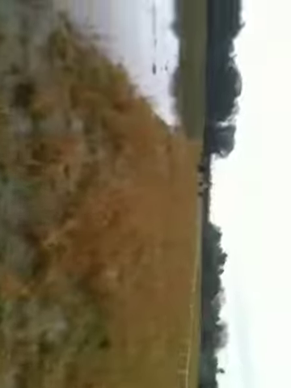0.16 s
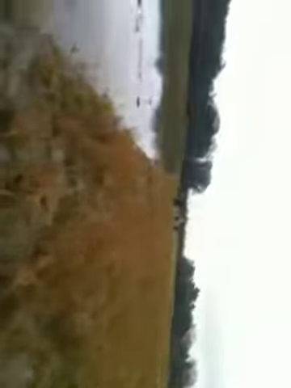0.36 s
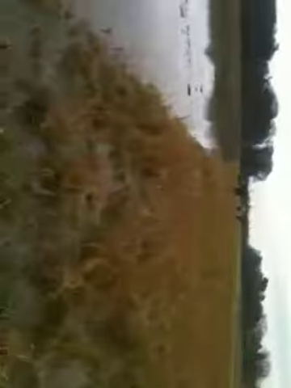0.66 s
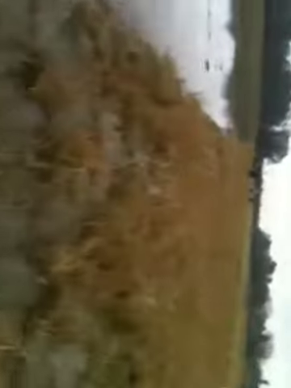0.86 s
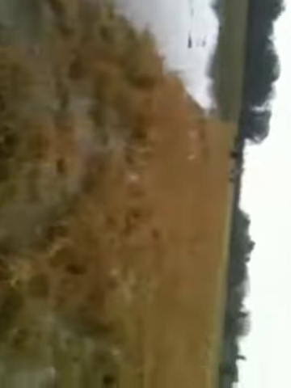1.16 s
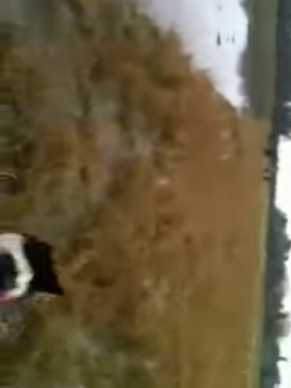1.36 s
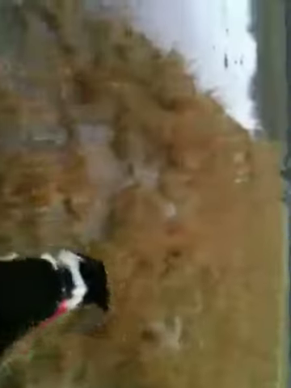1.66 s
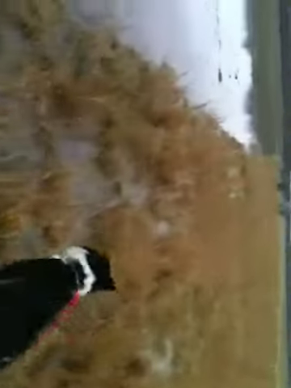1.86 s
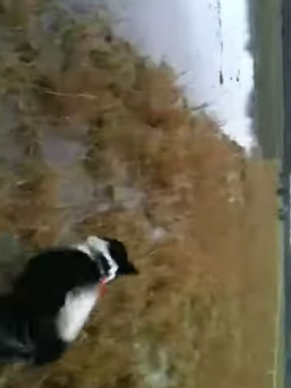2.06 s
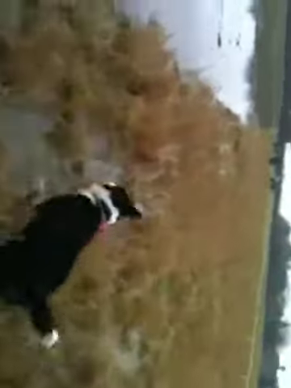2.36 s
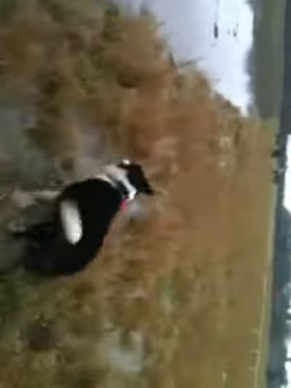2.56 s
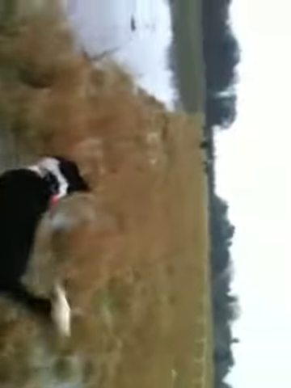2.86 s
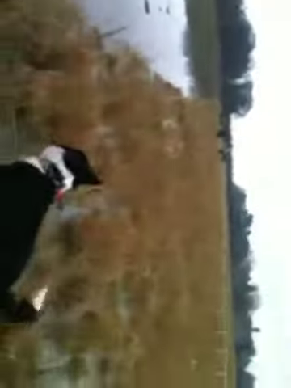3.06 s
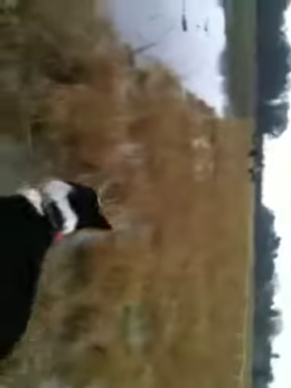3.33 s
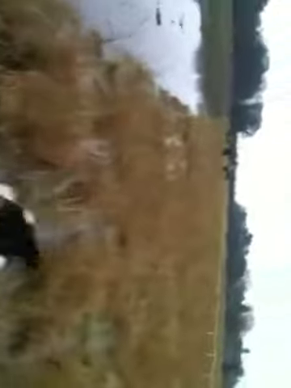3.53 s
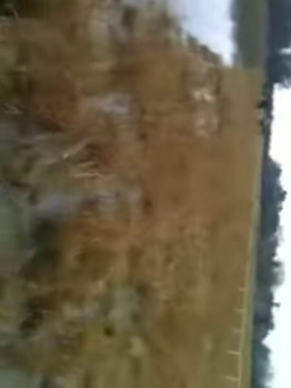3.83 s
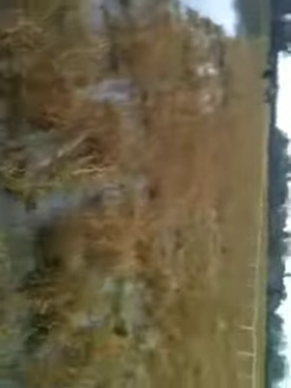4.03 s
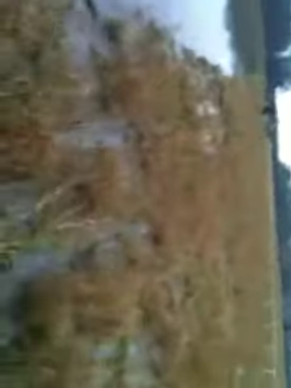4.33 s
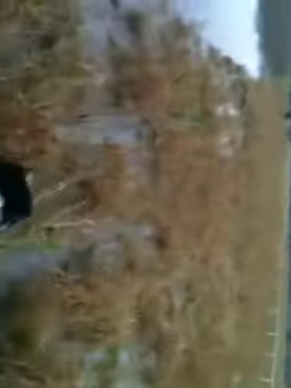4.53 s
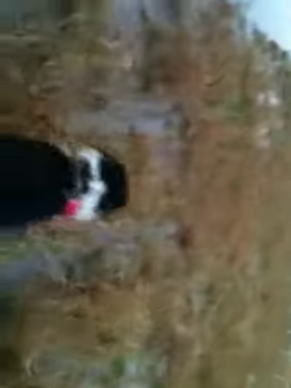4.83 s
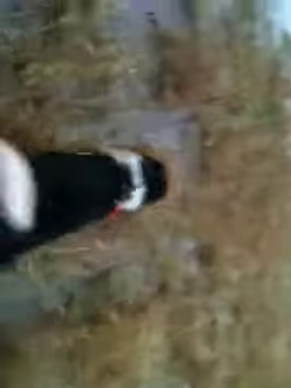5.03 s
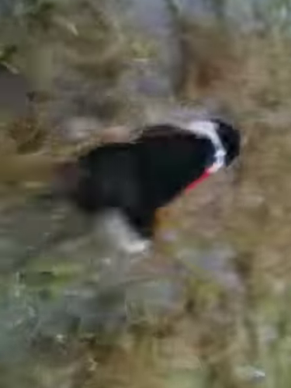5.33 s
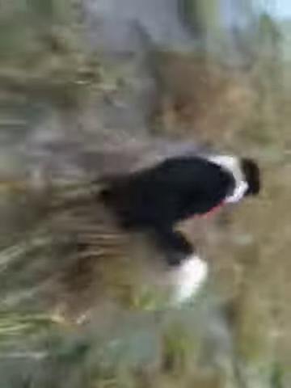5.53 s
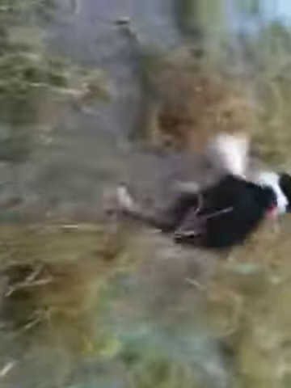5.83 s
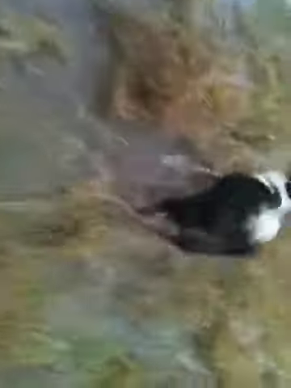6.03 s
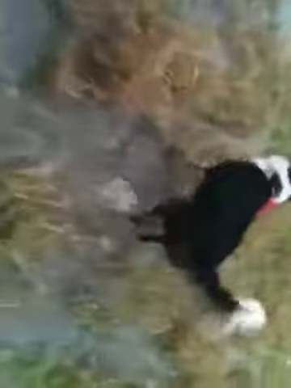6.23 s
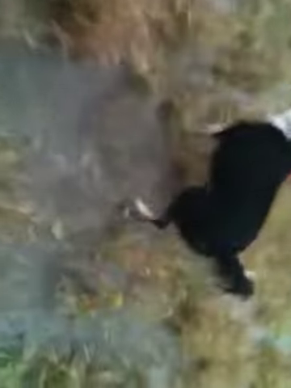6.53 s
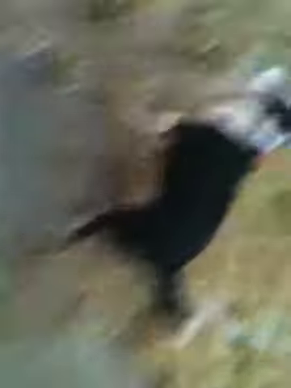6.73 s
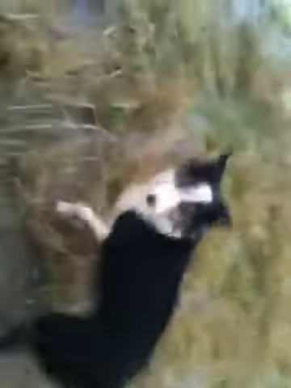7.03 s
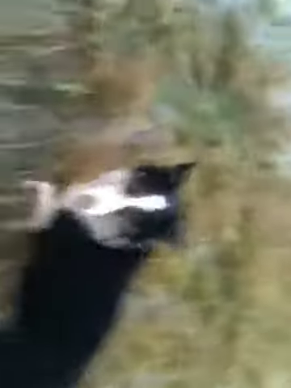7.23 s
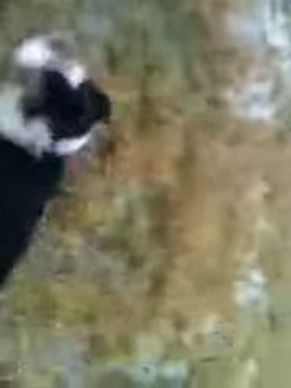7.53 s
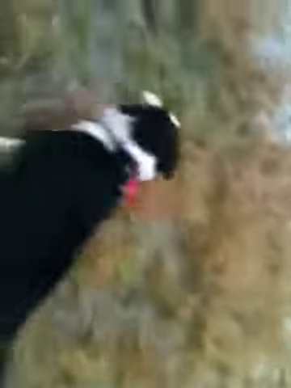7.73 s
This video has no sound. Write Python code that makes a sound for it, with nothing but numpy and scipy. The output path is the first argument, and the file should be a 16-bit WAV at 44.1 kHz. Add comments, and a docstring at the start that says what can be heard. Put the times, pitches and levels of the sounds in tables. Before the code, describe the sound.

A dog wades through shallow water in a flooded grassy field, paws slapping, splashing and gurgling close by over a faint distant engine hum.

```python
"""Stirred water trickles through a flooded grass field, close to the microphone, and a dog wades past in it.
Each step slaps the shallow water, throws spray (dense swarms of short damped tones and noise) through the grass
and traps air that gurgles, plops and chirps (damped bubbles). Paws thud softly in the sodden turf (low noise)
and stalks brush past (high hiss). Far away an engine hums (harmonics of its shaft over a rumble),
over a faint low rush with a thin, steady high hiss (coloured noise)."""
import sys
import numpy as np
from scipy import signal
from scipy.fft import rfft, irfft, next_fast_len
from scipy.io import wavfile
from scipy.ndimage import uniform_filter1d, map_coordinates

SR = 44100
rng = np.random.default_rng(int(sys.argv[2]) if len(sys.argv) > 2 else 0)


def log_audio(samples):
    """Write samples as a 16-bit WAV file to the path given in sys.argv[1]."""
    # one column per channel
    frames = np.atleast_2d(samples).T
    # limit to full scale, then quantise
    limited = np.clip(frames, -1, 1)
    pcm = np.round(limited * 32767).astype(np.int16)
    wavfile.write(sys.argv[1], SR, pcm)


N = 347508

# colour of water thrown through grass: (frequency [Hz], level [dB])
SPRAY_COLOUR = [(410, -27.5), (700, -12.5), (1680, -10), (3760, -1), (4460, -2), (5570, -0.5), (8790, -2),
                (11300, -9), (14200, -10.5), (15800, -15.5)]


def amp(db):
    """Decibels to gain."""
    return 10 ** (np.asarray(db) / 20)


def unit(x):
    """Scale to rms 1."""
    return x / np.sqrt(np.mean(x ** 2) + 1e-20)


def curves(rows):
    """One value per sample for each column after the time."""
    s, *cols = np.transpose(rows)
    return [np.interp(np.arange(N) / SR, s, c) for c in cols]


def wobble(rate):
    """A smooth random curve, rate knots a second."""
    knots = rng.standard_normal(int(N * rate / SR) + 4)
    return map_coordinates(knots, [np.arange(N) * rate / SR])


def filtered(x, response):
    """x times a response of frequency."""
    size = next_fast_len(len(x) + 4096)
    spectrum = rfft(x, size) * response(np.fft.rfftfreq(size, 1 / SR))
    return irfft(spectrum, size)[:len(x)]


def coloured(x, points):
    """x shaped by (frequency [Hz], level [dB]) points, at rms 1."""
    f, db = np.transpose(points)
    return unit(filtered(x, lambda hz: amp(np.interp(np.log(hz + 1), np.log(f), db))))


def around(centre_hz, width):
    """A hump of response around a pitch; half its height at width octaves to either side."""
    return lambda hz: 1 / (1 + (np.log2((hz + 1) / centre_hz) / width) ** 2)


def add(track, s, sound):
    """Mix a sound into the track at time s."""
    start = int(np.clip(round(s * SR), 0, N - 1))
    track[start:start + len(sound)] += sound[:N - start]


def patchy(x, depth_db):
    """x with its colour changing from moment to moment, in patches of about 1 kHz by 20 ms, at rms 1."""
    z = signal.stft(x, nperseg=256)[2]
    field = rng.standard_normal(z.shape)
    for axis in (0, 1, 0, 1):
        field = uniform_filter1d(field, size=6, axis=axis)
    changed = signal.istft(z * amp(depth_db * unit(field)), nperseg=256)[1]
    return unit(changed[:N])


def bubble(t, hz, t60, rise, swell=2):
    """A damped tone, as of an air bubble: swells over about swell cycles; pitch climbs by rise in each t60."""
    age = t / t60
    ring = np.sin(2 * np.pi * hz * t * (1 + rise * age / 2))
    return ring * amp(-60 * age) * (1 - np.exp(-hz * t / swell))


def bubbles(count, size, low_hz, high_hz, cycles, spread_db, rise, swell):
    """A swarm of damped tones with random times, pitches, lives (cycles on average), strengths, at rms 1."""
    when, pitch, life, bulk = rng.random((count, 4)).T[:, :, None]
    hz = low_hz * (high_hz / low_hz) ** pitch
    strength = amp(-spread_db * np.log(np.maximum(1 - bulk, .02))) * np.sqrt(hz)
    t60 = cycles * (.5 + life) / hz
    rings = strength * bubble(np.arange(size) / SR, hz, t60, rise, swell)
    index = (when * N).astype(int) + np.arange(size)
    return unit(np.bincount(index.ravel(), rings.ravel(), N)[:N])


def stirring():
    """Drive in dB for droplets, mist and gurgle: each step surges, sags and falls back over the steady wash."""
    # stirred water running back through the grass:
    # (time [s], relative trickle level [dB], relative gurgle level [dB])
    wash = [(0.0, -54, -49.5), (0.7, -58.0, -54.5), (1.1, -49, -48), (2.2, -50.5, -54.0),
            (2.95, -53.5, -55), (3.25, -63, -64.5), (3.9, -59.5, -52.0), (5.05, -51, -48.5),
            (5.6, -50, -53), (6.45, -49, -52), (7.2, -55.5, -59.0), (7.88, -55.5, -52)]
    # paws pushing through the water, and at 3.33 s wet grass brushing past, mostly fine mist: (time [s], length
    # of the push [s], t60 of the falling spray [s], relative droplet level [dB], relative fine mist level [dB],
    # relative gurgle level [dB])
    steps = [(0.064, 0.059, 0.25, -44.5, -58, -57), (0.208, 0.055, 2.3, -53.0, -48.0, -53.0),
             (0.325, 0.08, 0.48, -44.5, -44.5, -51), (0.476, 0.175, 0.28, -45.5, -47, -52),
             (0.706, 0.015, 0.92, -41.0, -45, -48.5), (0.873, 0.025, 0.37, -42.5, -41, -51.0),
             (0.945, 0.095, 0.21, -39.5, -45.5, -51), (1.241, 0.035, 0.59, -45.5, -44.5, -49),
             (1.46, 0.105, 0.21, -41.5, -40.5, -47), (1.706, 0.135, 0.24, -47.5, -44.5, -48),
             (1.87, 0.035, 0.36, -55.5, -64, -46), (2.049, 0.13, 1, -43.5, -45.0, -48),
             (2.331, 0.045, 0.17, -51.0, -47, -42.5), (2.44, 0.016, 0.11, -44, -50.5, -63),
             (2.621, 0.027, 0.17, -50.5, -57, -60), (2.711, 0.15, 0.27, -47, -47, -46),
             (3.33, 0.057, 0.38, -65.5, -51, -70), (3.435, 0.12, 0.12, -48.5, -47.5, -60.5),
             (3.62, 0.195, 0.13, -49, -52, -57), (3.919, 0.125, 0.49, -59, -58, -55.0),
             (4.047, 0.042, 1.5, -41, -42.5, -66), (4.247, 0.035, 0.39, -49.5, -49, -60),
             (4.338, 0.055, 0.21, -40, -42, -46), (4.499, 0.035, 0.3, -46.5, -42, -45.5),
             (4.566, 0.175, 1.8, -44.5, -43, -61), (4.798, 0.095, 0.23, -45, -43.0, -54.0),
             (5.105, 0.055, 0.85, -42, -42.5, -44), (5.247, 0.054, 0.67, -49, -40.5, -45),
             (5.357, 0.15, 0.44, -38.5, -41.5, -55), (5.621, 0.045, 0.48, -38.0, -40, -47),
             (5.758, 0.045, 0.26, -42, -41.5, -47), (5.876, 0.17, 0.78, -46, -42.5, -47.5),
             (6.037, 0.06, 0.49, -40.0, -41, -43.5), (6.214, 0.075, 0.33, -42.5, -46, -49.5),
             (6.554, 0.022, 0.33, -46.5, -42.5, -61), (6.64, 0.125, 0.98, -40.0, -41.5, -58),
             (6.942, 0.041, 0.39, -42, -44.5, -46), (7.082, 0.054, 0.17, -46.5, -53, -52.5),
             (7.25, 0.025, 0.89, -42.5, -41, -67), (7.385, 0.055, 0.63, -41.0, -41.0, -58),
             (7.529, 0.035, 0.3, -41, -39, -40.5), (7.651, 0.095, 0.33, -43.5, -43.5, -61),
             (7.731, 0.045, 1.5, -42.5, -42.5, -43)]
    # brief dips in the splashing before some steps: (middle time [s], depth [dB])
    pauses = [(0.162, 5.5), (0.686, 6), (3.58, 2), (3.85, 4.5), (4.545, 5), (5.593, 0.5), (7.2, 4.5)]
    attack_s, sag_db_per_s = 0.0079, 10.5  # the spray leaps up, then thins while the push lasts
    pause_s = .019  # from the middle of a dip to its edge

    trickle_db, churn_db = curves(wash)
    power = amp([trickle_db, trickle_db + 1.5, churn_db + 1]) ** 2  # droplets, mist, gurgle
    t = np.arange(SR) / SR
    for s, length, t60, *levels_db in steps:
        sag_db = sag_db_per_s * np.minimum(t, length)
        fall_db = sag_db + 60 * np.maximum(t - length, 0) / t60
        surge = (1 - np.exp(-t / attack_s)) * amp(-fall_db)
        for layer, db in zip(power, levels_db):
            add(layer, s, (amp(db) * surge) ** 2)
    now = np.arange(N) / SR
    pause_db = sum(db * np.exp(-((now - s) / pause_s) ** 4) for s, db in pauses)
    return 10 * np.log10(power) - pause_db


def spray(drop_db, mist_db):
    """Drops patter back in a dense spatter with a glassy, ringing tinkle; finer mist crackles in the grass."""
    drops = bubbles(count=8000, size=256, low_hz=1267, high_hz=7120,
                    cycles=15.7, spread_db=2.0, rise=0.3, swell=0.28)
    tinkle = bubbles(count=2600, size=700, low_hz=2000, high_hz=11000,
                     cycles=42, spread_db=3.6, rise=.15, swell=2)
    mist = bubbles(count=12000, size=96, low_hz=4240, high_hz=15600,
                   cycles=6.4, spread_db=-1.0, rise=.1, swell=0.4)
    # single near drops
    ticks = bubbles(count=450, size=128, low_hz=2630, high_hz=14200,
                    cycles=5.6, spread_db=2.5, rise=0.086, swell=.3)
    near = amp(-4) * tinkle + amp(-5) * ticks

    # the patter keeps the lower band, the fizz the rest; they cross near 5.5 kHz
    coarse = lambda hz: 1 / np.sqrt(1 + (hz / 5500) ** 6)
    fine = lambda hz: np.sqrt(1 - coarse(hz) ** 2)
    patter = coloured(drops + near + amp(8.5) * rng.standard_normal(N), SPRAY_COLOUR)
    fizz = coloured(mist + near + amp(7.0) * rng.standard_normal(N), SPRAY_COLOUR)
    patter = patchy(filtered(patter, coarse), depth_db=2.0)
    fizz = patchy(filtered(fizz, fine), depth_db=2.0)
    clumps = amp(1.26 * wobble(60) + 1.16 * wobble(280))  # water lands in lumps
    return clumps * (amp(drop_db - 0.13) * patter + amp(mist_db + 0.34) * fizz)


def gurgle(level_db):
    """Churned water: middle-sized bubbles over a soft slosh."""
    # colour of the churned water: (frequency [Hz], level [dB])
    gurgle_colour = [(200, -4.5), (350, -9), (600, -3), (1200, -1), (2000, 0), (4000, 8.5), (9000, -24)]
    swarm = bubbles(count=2600, size=1500, low_hz=378.8, high_hz=2600,
                    cycles=16.0, spread_db=2.5, rise=0.32, swell=1.9)
    slosh = rng.standard_normal(N) * amp(7.34 * wobble(70))
    return amp(level_db - 4.5) * coloured(swarm + amp(-3) * slosh, gurgle_colour)


def engine():
    """Exhaust orders creep up in pitch, pass the silencer's resonance and fade separately across the field."""
    # the distant engine, slowly speeding up: (time [s], shaft speed [Hz])
    shaft = [(0, 17.6), (1.3, 18.1), (3, 18.8), (4.2, 19.33), (5, 19.62), (6.4, 19.9), (7.88, 20.15)]
    # its loudness: (time [s], relative exhaust note level [dB], relative rumble level [dB])
    loudness = [(0, -64.5, -71), (1.03, -68, -66.5), (2.39, -66.5, -68), (2.72, -62.5, -64),
                (3.47, -57.5, -66), (3.64, -59, -60), (4.15, -52, -59.5), (4.96, -58.5, -64),
                (5.4, -69.5, -62.5), (7.02, -58, -58.5), (7.16, -53.5, -65), (7.88, -60, -58)]
    # its exhaust note: (multiple of the shaft speed [1], relative level [dB])
    exhaust = [(5, -13.5), (6, -30), (7, -0.5), (8, -2.5), (9, -27), (11, -28), (12, -10), (19, -20),
               (20, -21), (21, -21), (25, -17)]
    rumble_colour = [(40, -36), (75, -16), (105, -20.0), (150, 2.5), (200, -3.5), (290, -11),
                     (500, -12.5), (900, -13.0), (2000, -39)]

    (shaft_hz,), (note_db, rumble_db) = curves(shaft), curves(loudness)
    angle = 2 * np.pi * np.cumsum(shaft_hz) / SR
    silencer = around(173.0, width=0.022)
    note = np.zeros(N)
    for order, db in exhaust:
        fading_db = 1.2 * wobble(3)
        waver = .2 * wobble(5)  # phase, in radians
        resonance_db = 6.4 * silencer(order * shaft_hz)
        note += amp(db + fading_db + resonance_db) * np.sin(order * angle + waver)
    rumble = coloured(rng.standard_normal(N), rumble_colour)
    return amp(note_db + 1.0) * note + amp(rumble_db + 3.0) * rumble


def rush_and_hiss():
    """A low rush with a thin, steady high hiss: steady coloured noise."""
    # colour of the rush and hiss: (frequency [Hz], level [dB])
    rush_colour = [(25, -43), (70, -12.5), (140, 6.5), (300, -3), (700, -12), (2000, -7.5), (6000, -17),
                   (10000, -7.5), (15000, -11.5)]
    return amp(-59) * coloured(rng.standard_normal(N), rush_colour)


def thuds():
    """Weight landing on the sodden turf makes a dull, short push."""
    # footfalls in soft turf: (time [s], relative level [dB])
    footfalls = [(0.065, -45), (1.457, -61), (1.86, -45), (2.389, -49), (2.988, -45), (5.626, -47),
                 (7.138, -42), (7.268, -39.5), (7.389, -40), (7.432, -35), (7.743, -38)]
    turf_colour = [(40, -53), (110, -2), (190, -1.0), (380, -13.5), (900, -46), (3000, -70)]
    track, t = np.zeros(N), np.arange(8192) / SR
    push = amp(-60 * t / 0.11) * (1 - np.exp(-t / 0.0029))
    for s, db in footfalls:
        earth = coloured(rng.standard_normal(len(t)), turf_colour)
        add(track, s, amp(db - 1.5) * earth * push)
    return track


def chirps():
    """Bubbles rising under a lifted paw shrink their cavity and glide upward."""
    # bubbles that break the surface:
    # (time [s], relative level [dB], starting pitch [Hz], rise in pitch per t60 [share])
    rising = [(0.168, -39, 1380, 1.25), (1.24, -35, 1720, 1.4), (3.017, -42, 2700, 0.22),
              (3.195, -47.5, 617, 0.76), (3.942, -39.5, 925, 0.078), (3.983, -39, 780, 1.9),
              (4.012, -43.5, 1700, 0.97), (4.321, -35, 2440, 0.32), (4.526, -41, 1010, 0.61)]
    t60_at_1khz = 0.0525  # seconds; smaller bubbles die sooner
    track, t = np.zeros(N), np.arange(6000) / SR
    for s, db, hz, rise in rising:
        t60 = t60_at_1khz * (1000 / hz) ** .5
        add(track, s, amp(db + 6) * bubble(t, hz, t60, rise, swell=7.9))
    return track


def plops():
    """A trapped pocket of air pinches off with a soft gulp and rings as one large bubble."""
    # the largest single bubbles: (time [s], relative level [dB], starting pitch [Hz])
    pockets = [(0.234, -35.5, 940), (0.516, -31.5, 1120), (0.547, -39, 795), (0.706, -31, 1570),
               (0.89, -28, 1680), (0.993, -35, 1750), (1.339, -34, 647), (1.77, -33, 970),
               (1.879, -32, 1110), (1.893, -28.5, 1820), (2.052, -32, 1000), (2.359, -31, 1750),
               (2.754, -35, 840), (4.262, -33, 1060), (4.866, -32, 975), (5.171, -36, 655),
               (5.763, -35, 715), (6.217, -37, 915), (6.836, -30, 1240), (7.536, -23, 1940),
               (7.578, -23.5, 1244), (7.825, -33, 1130), (7.862, -30, 795)]
    track, t = np.zeros(N), np.arange(6000) / SR
    pinch = amp(-60 * t / 0.038) * (1 - np.exp(-t / 0.00051))
    for s, db, hz in pockets:
        gulp = unit(filtered(rng.standard_normal(len(t)), around(hz, width=0.62))) * pinch
        t60 = 0.041 * (900 / hz) ** .5  # small bubbles die sooner
        ring = bubble(t, hz, t60, rise=0.27, swell=1.6)
        add(track, s, amp(db) * (amp(-6.0) * ring + amp(-9.5) * gulp))
    return track


def slap(db, hz, treble_db):
    """A spatter of a few milliseconds, tuned by a bursting air pocket, then a trail of spray."""
    t = np.arange(4096) / SR
    noise = coloured(rng.standard_normal(len(t)), SPRAY_COLOUR)
    spatter = noise + 1.35 * filtered(noise, around(hz, width=0.25))
    crack = spatter * (t / .0016) * np.exp(1 - t / 0.0019)
    crack *= 9 / np.linalg.norm(crack)  # even energy before its level is set
    trail_db = -41 + 0.22 * db  # the trail grows far less than the slap
    trail = noise * amp(trail_db - 60 * t / 0.053) * (1 - np.exp(-t / 0.0029))
    burst = bubble(np.maximum(t - .0012, 0), hz, 0.0021, rise=0.1, swell=0.93)  # 1.2 ms late
    treble_gain = amp(treble_db + 10.5)
    shelf = lambda f: 1 + (treble_gain - 1) / (1 + (9500 / (f + 1)) ** 6)
    return filtered(amp(db - 13.0) * crack + trail + amp(db - 3.5) * burst, shelf)


def slaps():
    """The sharp slaps of paws and falling water on the surface."""
    # the sharpest slaps:
    # (time [s], relative level [dB], starting pitch of the burst [Hz], relative treble level [dB])
    impacts = [(0.448, -15, 5830, -6), (0.7054, -15.5, 2360, -5.5), (0.7245, -25.5, 5990, 1),
               (0.993, -14.5, 3730, -7), (1.0318, -15, 5640, -4), (1.088, -23, 9700, 0.5),
               (1.2958, -12, 5600, -33.5), (1.463, -19.5, 3460, -4), (1.7686, -15.5, 4250, -9),
               (2.0548, -16, 9000, -22), (2.617, -20, 4670, -21), (2.644, -18.5, 4600, -14),
               (2.865, -21, 7140, -23), (3.004, -37, 9000, 1), (3.4388, -21, 3250, -23),
               (3.5034, -20.5, 6040, -2), (3.5408, -29, 6740, -3), (4.267, -14, 9700, -16),
               (4.3568, -15, 3940, -10), (4.5731, -14.5, 5440, -8), (4.7261, -15.5, 5500, -9),
               (4.806, -13, 5600, -11), (4.885, -15.5, 3100, -17.5), (5.391, -16, 5600, -1),
               (5.623, -15, 5600, -11), (5.877, -19.5, 4740, -21), (5.949, -20, 4900, -20),
               (6.119, -17, 3440, -25), (6.1437, -17.5, 8600, -14), (6.22, -17, 3900, -28),
               (6.2282, -14.5, 3880, -30), (6.556, -17, 4800, -11), (6.641, -9.5, 3150, -36),
               (6.783, -14, 3000, -29), (6.866, -18, 3840, -20), (7.2674, -9, 4200, -4),
               (7.413, -11, 4200, -24), (7.433, -14.5, 8600, -10), (7.4632, -16, 3170, -28),
               (7.5497, -2, 3620, -17), (7.565, -12, 6900, -17), (7.7338, -9.5, 9300, -17)]
    track = np.zeros(N)
    for s, db, hz, treble_db in impacts:
        add(track, s, slap(db, hz, treble_db))
    return track


def plunges():
    """A paw punches a hollow into the water, which collapses in a broad, low glug."""
    # paws plunging into deeper water: (time [s], relative level [dB], pitch of the cavity [Hz])
    hollows = [(0.491, -43, 620), (1.46, -41.5, 545), (1.888, -42.5, 719), (2.379, -47, 510),
               (5.289, -43.5, 600), (5.625, -35.5, 780), (5.641, -39, 540), (5.797, -47, 517),
               (6.216, -43, 895), (7.535, -44.5, 364)]
    track, t = np.zeros(N), np.arange(6000) / SR
    collapse = amp(-60 * t / 0.071) * (1 - np.exp(-t / 0.0019))
    for s, db, hz in hollows:
        glug = filtered(rng.standard_normal(len(t)), around(hz, width=0.59)) * collapse
        glug /= np.abs(glug).max()
        ring = bubble(t, hz, 0.025, rise=0.11, swell=0.65)
        add(track, s, amp(db) * (amp(4) * glug + amp(7) * ring))
    return track


def swishes():
    """Stalks sliding over each other: a thin, very high hiss that swells and fades."""
    # wet grass brushing past close by: (time [s], length [s], rms level before the swell [dB])
    brushes = [(2.96, .2, -61), (3.293, 0.19, -52)]
    track = np.zeros(N)
    for s, length, db in brushes:
        swell = np.hanning(int(length * SR))
        hiss = unit(filtered(rng.standard_normal(len(swell)), around(13400, width=.28)))
        add(track, s, amp(db) * swell * hiss)
    return track


def scene():
    """Water, grass, steps and engine over a faint rush and hiss."""
    drop_db, mist_db, gurgle_db = stirring()
    water = spray(drop_db, mist_db) + gurgle(gurgle_db)
    water += chirps() + plops() + slaps() + plunges()
    field = engine() + rush_and_hiss() + thuds() + swishes()
    return (water + field)[None]


def record(dry):
    """The microphone chain keeps nothing above its band limit."""
    top_hz = 15900
    return filtered(dry[0], lambda hz: hz < top_hz)[None]


dry = scene()
out = record(dry)
log_audio(out)
```